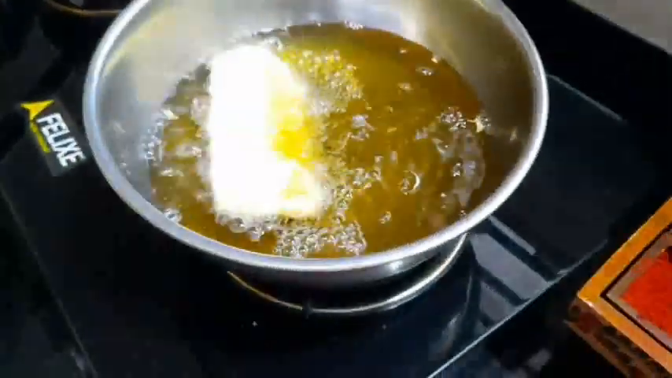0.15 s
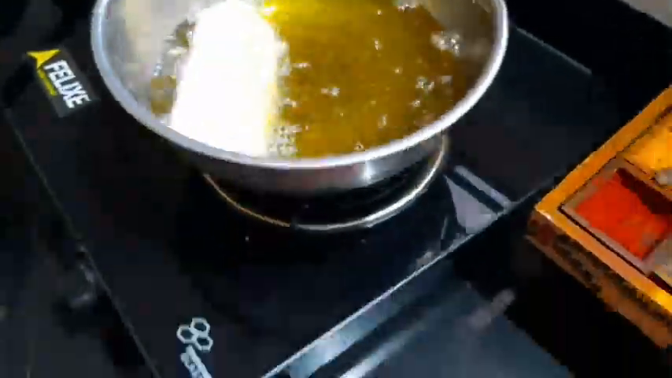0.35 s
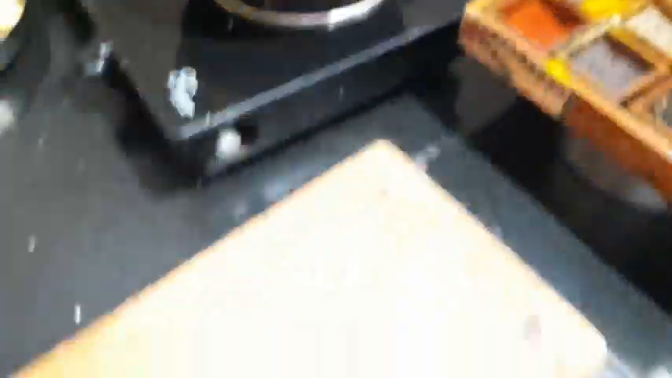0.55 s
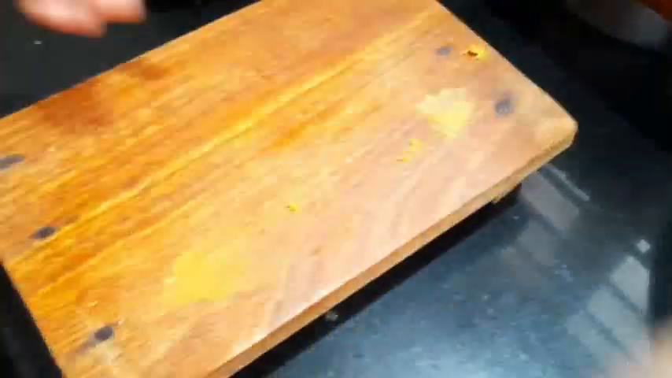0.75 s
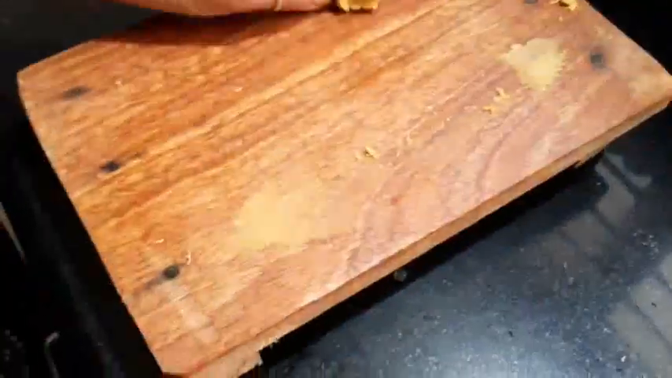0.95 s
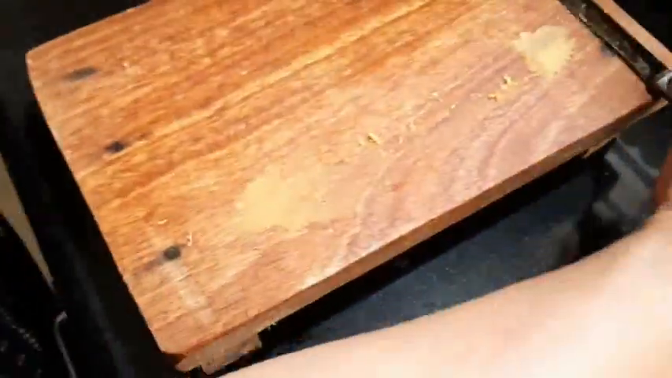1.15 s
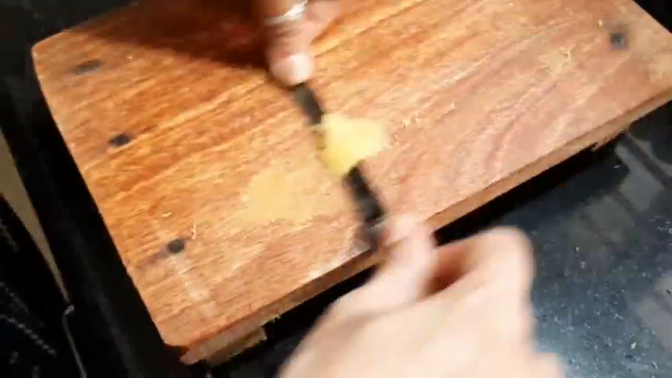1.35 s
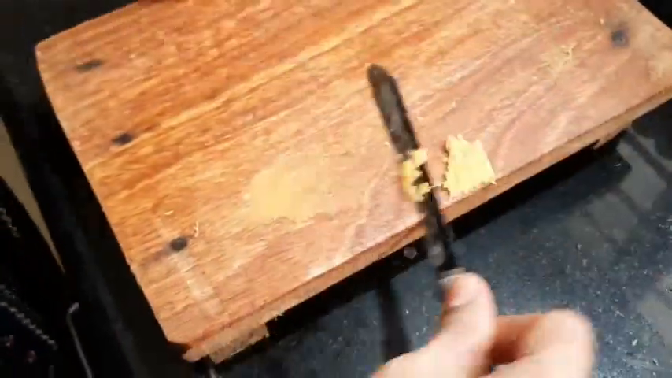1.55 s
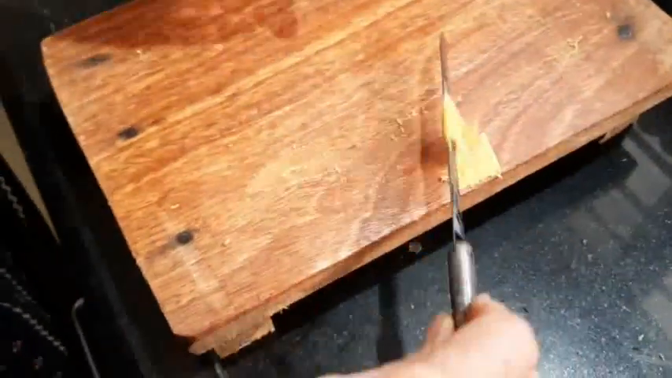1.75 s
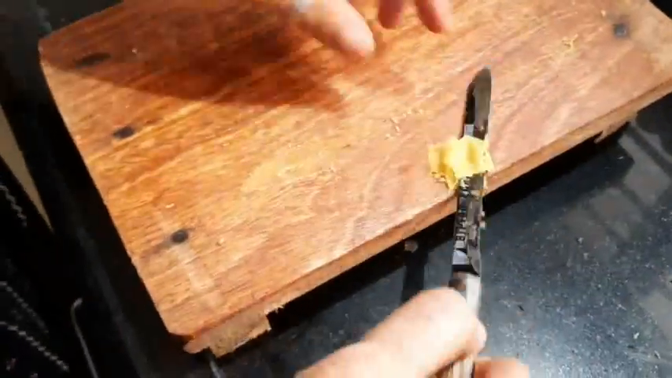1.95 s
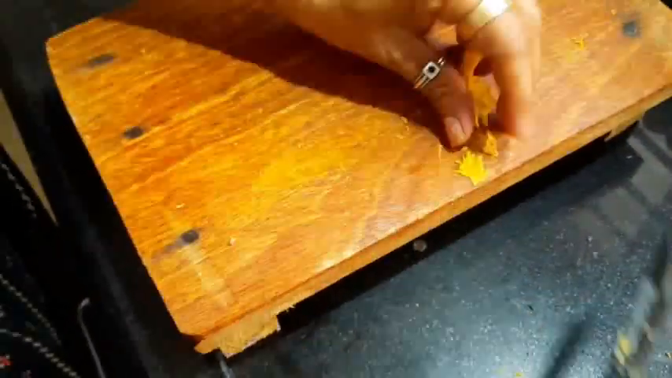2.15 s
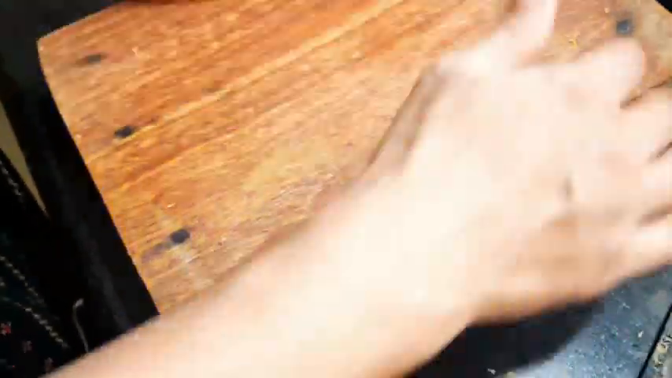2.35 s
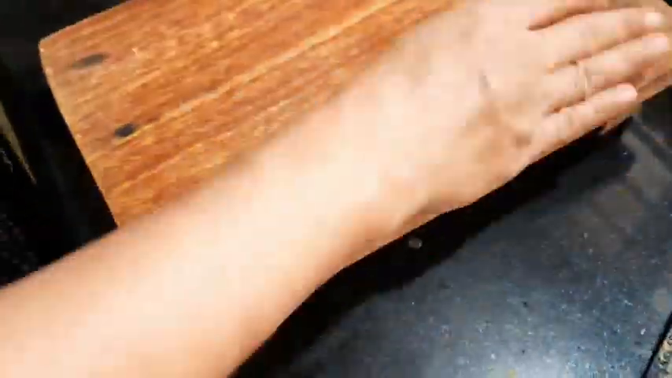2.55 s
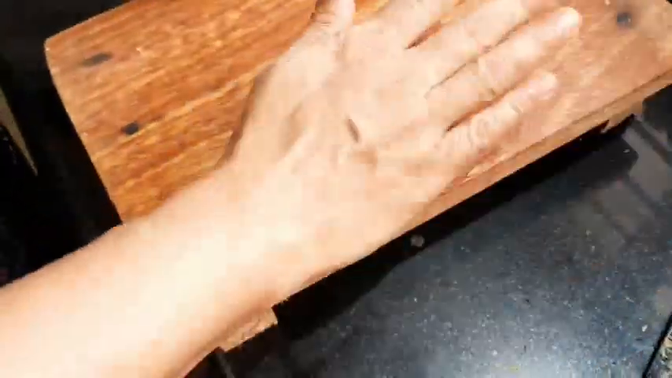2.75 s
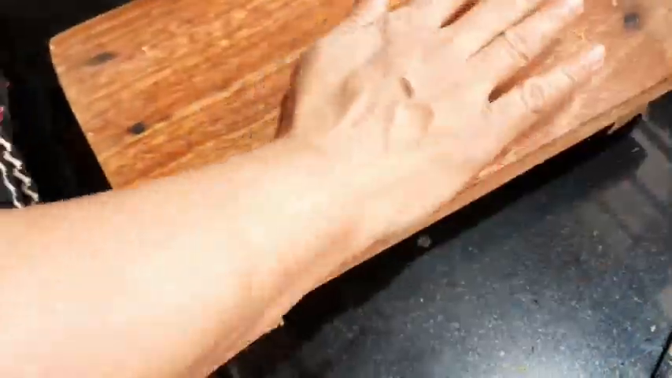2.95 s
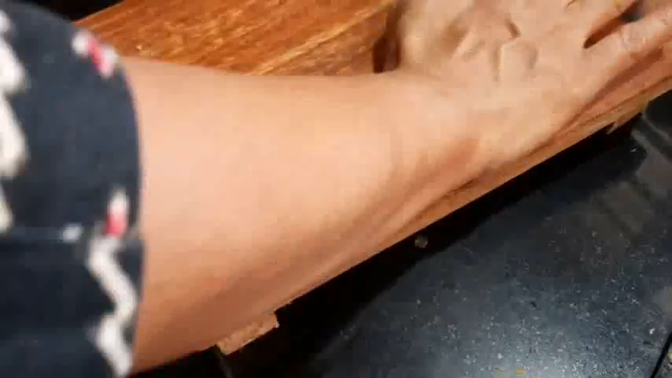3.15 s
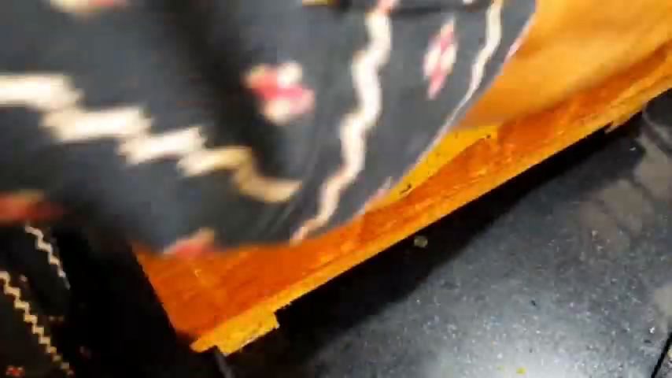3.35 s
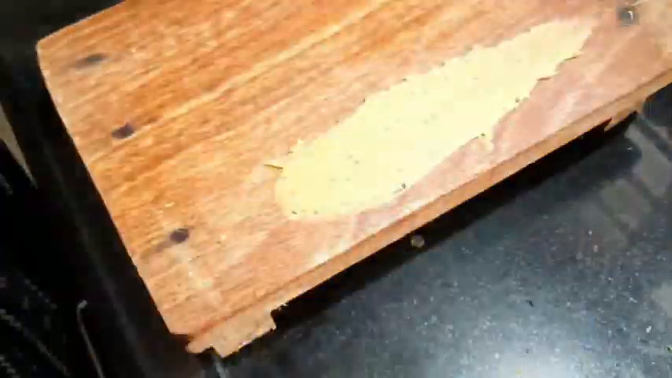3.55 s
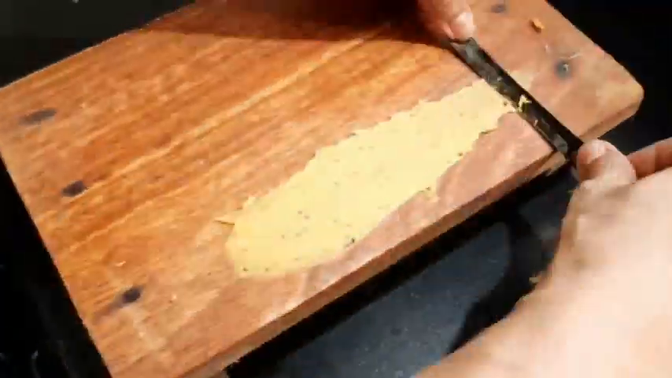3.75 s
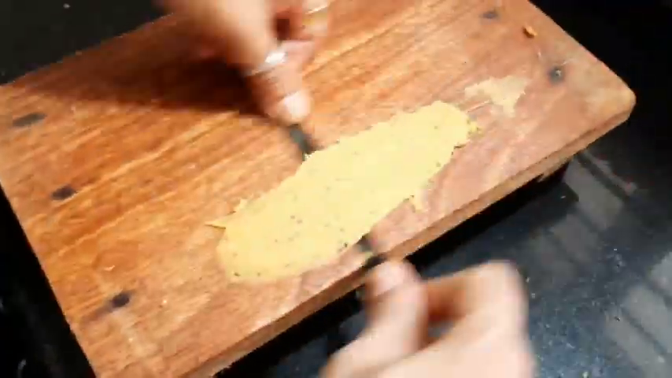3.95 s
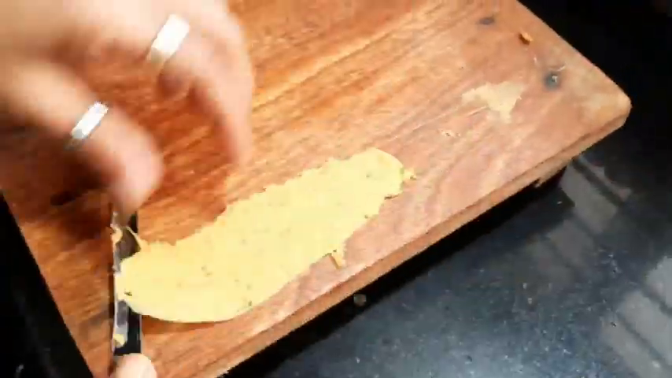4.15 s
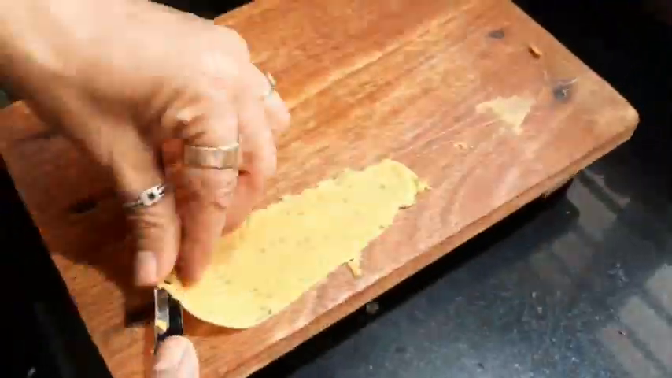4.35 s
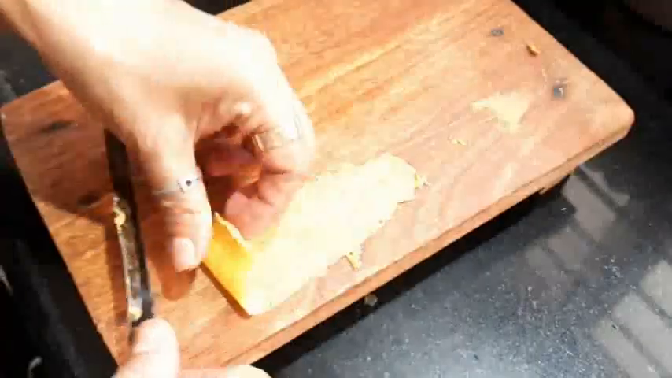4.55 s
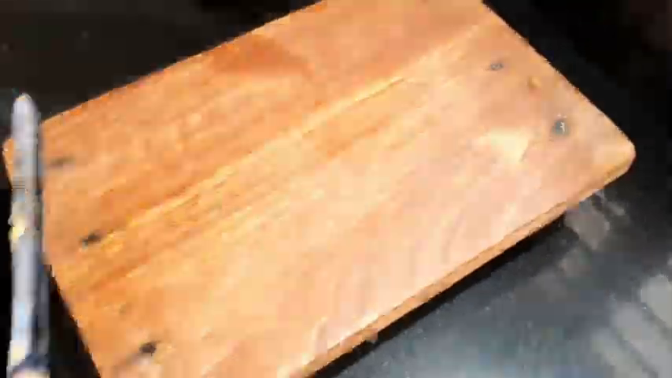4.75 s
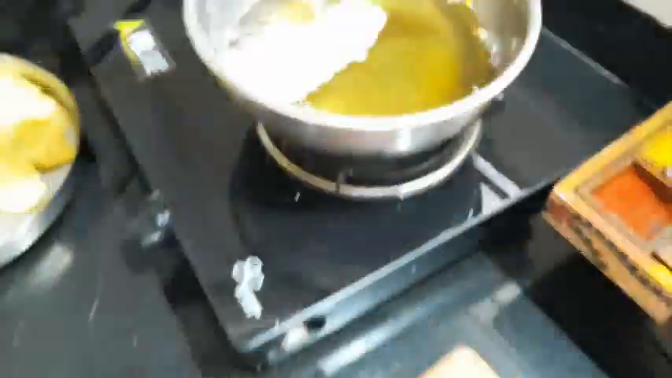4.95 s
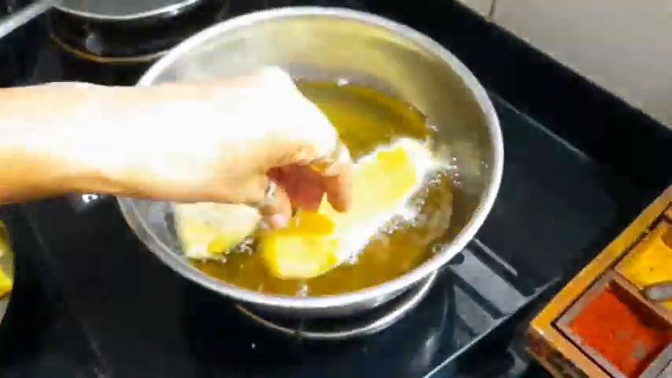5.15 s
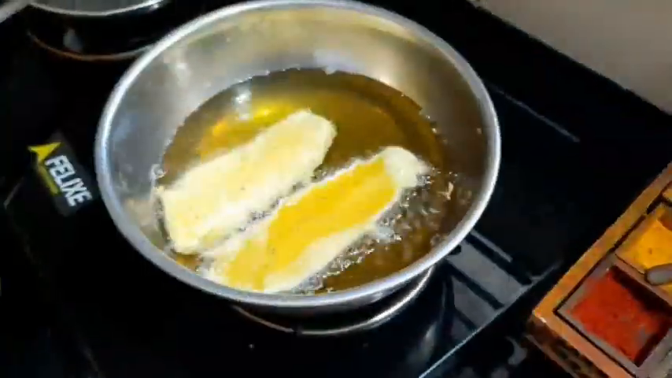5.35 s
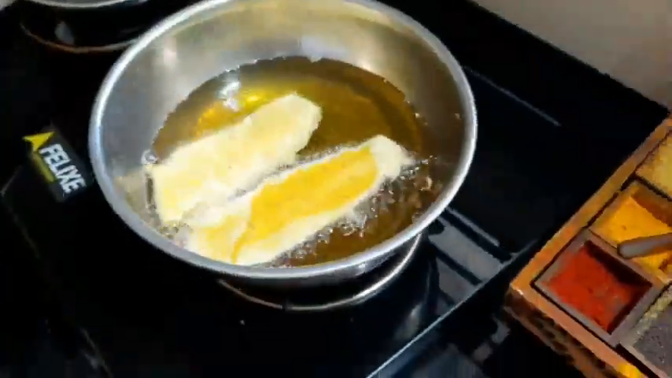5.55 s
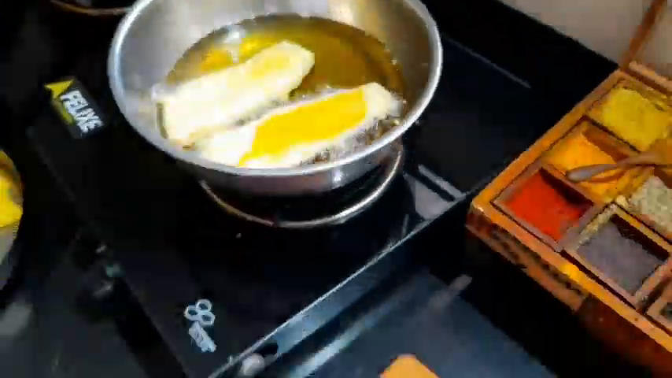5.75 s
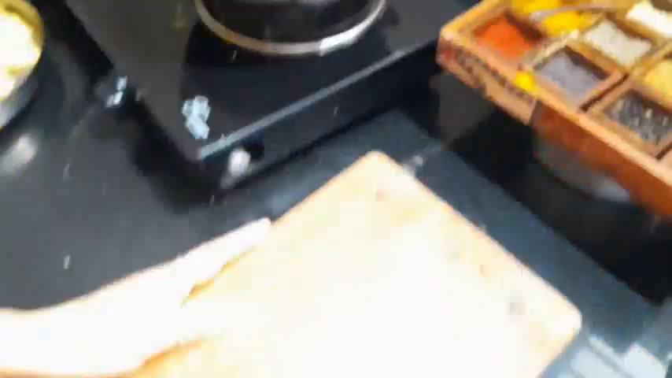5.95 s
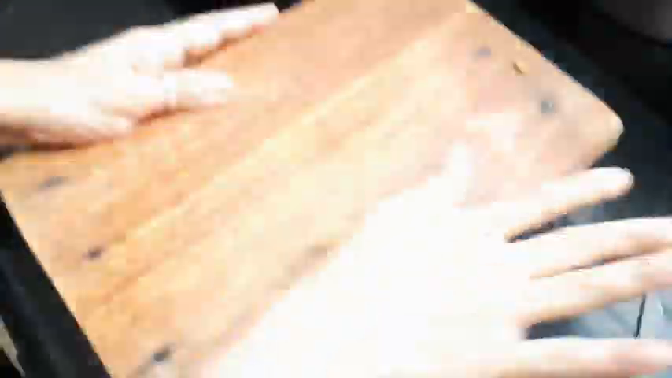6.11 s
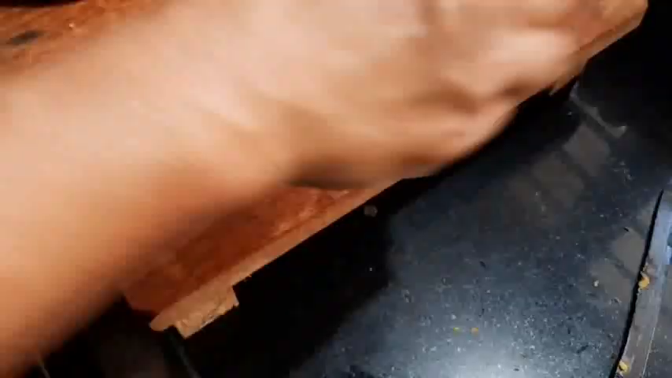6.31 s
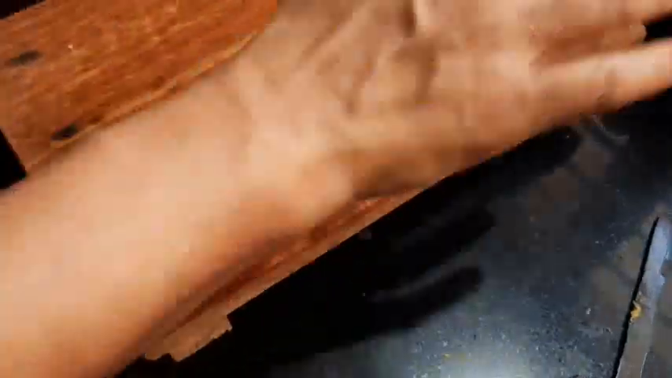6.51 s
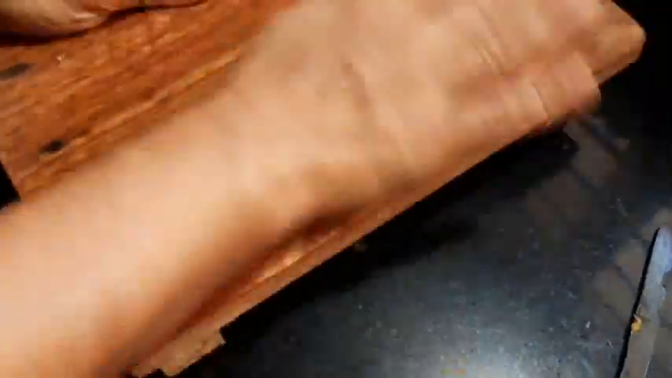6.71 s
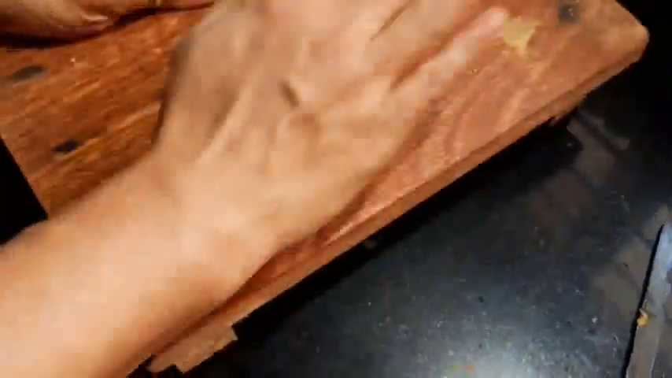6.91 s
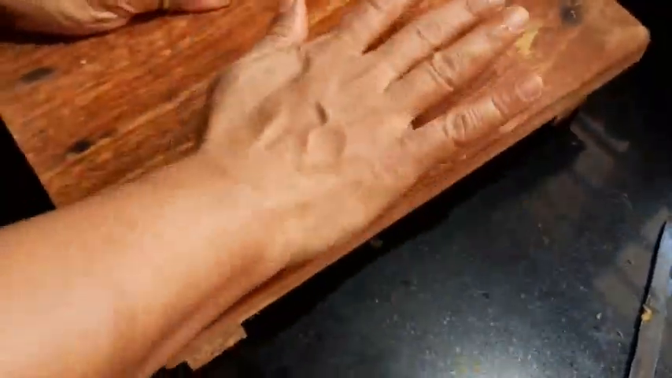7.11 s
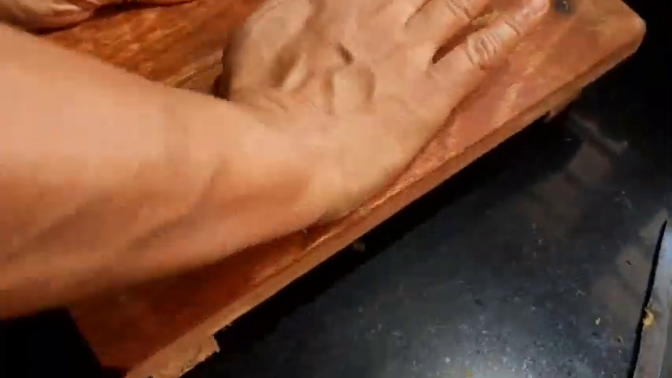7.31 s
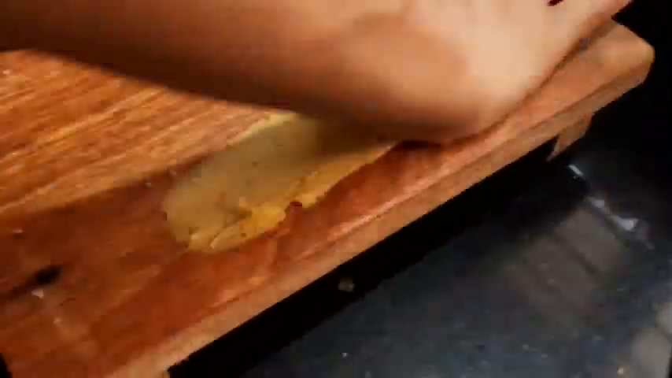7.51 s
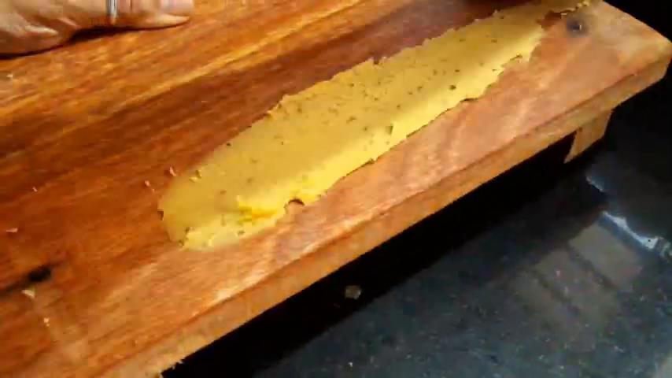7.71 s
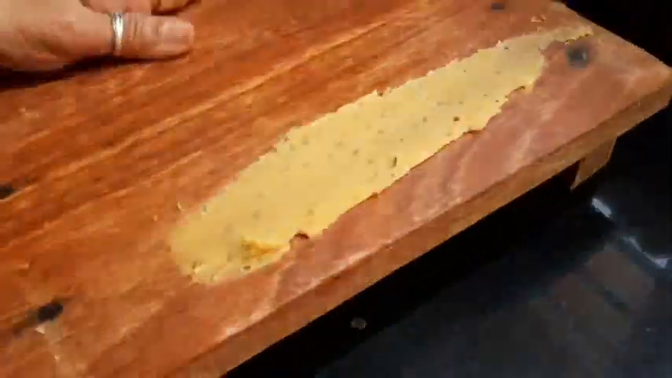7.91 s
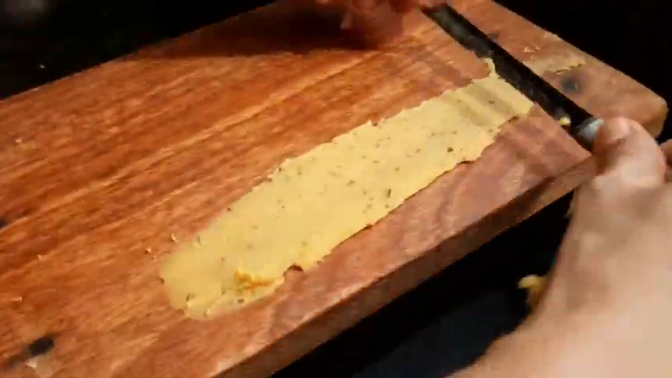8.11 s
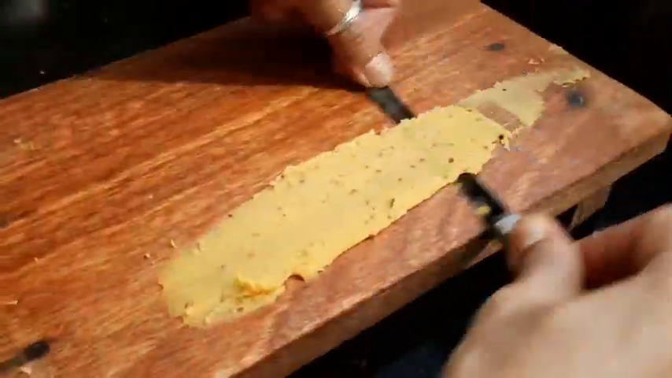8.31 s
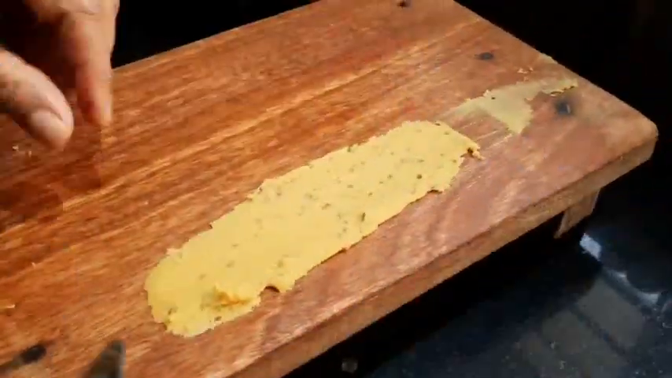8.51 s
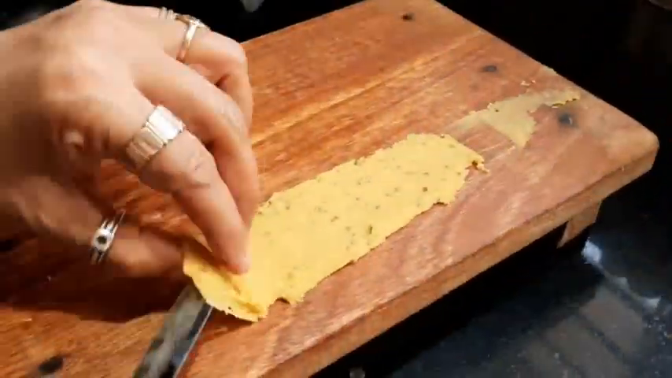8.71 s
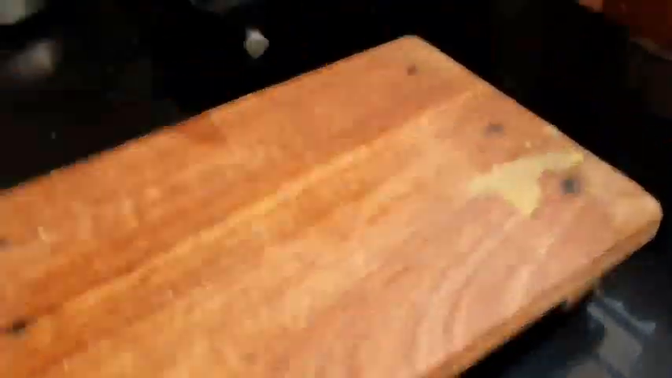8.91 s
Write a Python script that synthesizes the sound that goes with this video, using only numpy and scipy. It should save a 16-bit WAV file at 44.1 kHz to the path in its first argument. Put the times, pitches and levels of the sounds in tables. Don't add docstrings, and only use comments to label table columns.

```python
import sys
import numpy as np
from scipy import signal
from scipy.fft import rfft, irfft, next_fast_len
from scipy.io import wavfile

SR = 44100
rng = np.random.default_rng(int(sys.argv[2]) if len(sys.argv) > 2 else 0)


def dump(signal):
    limited = np.clip(np.atleast_2d(signal).T, -1, 1)
    pcm = np.round(limited * 32767).astype(np.int16)
    wavfile.write(sys.argv[1], SR, pcm)


def amplitude_ratio(level_db):
    exponent = np.asarray(level_db, float) / 20
    return 10 ** exponent


N = 399987

T = np.arange(round(.22 * SR)) / SR - .06
PORTS = np.array([[1], [-1]])

# frequency in Hz, level under the sum in dB.
SIDE_SHARE = [(60, -20), (110, -7.5), (200, -14), (380, -7.5), (700, -4), (1290, 0.5), (2380, -1),
              (4400, 1), (8120, -11.5), (15000, -11.5)]

# frequency in Hz, level in dB per Hz.
FRYING_COLOUR = [(1470, 1), (2500, -2), (3140, -6), (3290, -6), (4360, -4.5), (6430, -1.5), (10000, -4),
                 (12700, 0.5), (14500, -1), (15400, -2.5)]
KITCHEN_COLOUR = [(120, -65), (200, -1), (346, 4), (409, -5), (473, -6), (796, -8.5), (1260, -16),
                  (1760, -13), (2110, -17), (2600, -15.5), (3170, -18), (4500, -27.5), (5850, -38),
                  (9900, -120)]
RUMBLE_COLOUR = [(15, -63), (25, -23), (48, -16.5), (72, -10.5), (86, 0.5), (102, -6.5), (123, -6.5),
                 (190, -10), (250, -58), (420, -120)]
# time in seconds, frying level in dB.
PAN_NEARNESS = [(0, -49), (.12, -51), (.45, -55), (.7, -61), (1, -58.5), (2.3, -60), (2.7, -62),
                (4.05, -61), (4.2, -62), (4.77, -63), (5, -57), (5.38, -46.5), (5.71, -53.5), (6.2, -56.5),
                (6.9, -59.5), (8.15, -60), (8.36, -54.5), (8.52, -60.5)]
# time in seconds, level over rest in dB.
HAND_EFFORT = [(0, 4.5), (.5, 0.5), (1, 4), (1.3, 7), (1.6, 9), (1.8, 0), (2.2, 3.5), (2.32, 15.5),
               (2.5, 1.6), (3.95, 4.5), (4.2, -1), (5.2, 1.5), (6.2, 1.5), (6.55, 3.5), (6.9, -1.5),
               (8.03, 3), (8.2, 11), (8.7, 1)]
KITCHEN_DB, RUMBLE_DB, FAR_PAN_DB = -58, -58, -60.5
KITCHEN_FOLLOWS_EFFORT, KITCHEN_FOLLOWS_PAN = 0.58, 0.21

# peak in seconds, peak level in dB.
THUDS = [(1.455, -33), (1.529, -35), (1.679, -33.5), (1.78, -24), (2.008, -20), (2.24, -36), (2.336, -28),
         (2.421, -21.5), (2.636, -24), (3.428, -20), (3.593, -34), (4.023, -30), (5.125, -33.5),
         (5.998, -23.5), (6.059, -34), (6.157, -36), (6.263, -25), (6.384, -27.5), (6.443, -28.5),
         (6.586, -34), (6.663, -15.5), (6.835, -37), (7.723, -18.5), (8.175, -24), (8.401, -22),
         (8.483, -27)]
SLAB_HZ = 85.4
# peak in seconds, peak level in dB, pitch in Hz.
NUDGES = [(0.13, -37.5, 136), (1.138, -39, 170), (1.297, -34, 145), (1.501, -35.5, 129),
          (1.579, -31.5, 170), (2.211, -37, 126), (3.737, -24.5, 172)]
# peak in seconds, peak level in dB, pitch in Hz, left over right in dB.
PORT_BUMP = [
    (0.731, -36.5, 59, 21),
]

# bite in seconds, lead-in in seconds, drag in seconds, edge hiss in dB, wood tone in dB.
STROKES = [
    (1.28, 0.062, 0.11, -45, -41),
    (1.535, 0.041, 0.09, -49, -46),
    (3.92, 0.079, 0.17, -55.5, -51),
    (8.35, 0.071, 0.042, -49.5, -47),
    (8.45, 0.016, 0.043, -55, -53),
]
# resonance in Hz, width in Hz, level in dB.
SCRAPED_WOOD = [(620, 130, 4), (840, 125, 5.5), (1200, 270, -19), (1760, 150, -7), (2250, 140, -6),
                (3100, 230, -20)]
# frequency in Hz, level in dB per Hz.
EDGE_COLOUR = [(1180, -24), (2000, -21), (2270, -28), (3610, -20), (7280, -8.5), (7930, -14.5),
               (10500, -14.5), (12200, -10), (15400, -16)]
EDGE_LEAD_IN_DB, WOOD_LEAD_IN_DB = 29, 38
EDGE_SAG_DB_PER_S, WOOD_SAG_DB_PER_S = 42, 49
LIFT_DB_PER_S = 500

# peak in seconds, peak level in dB, centre in Hz, rise in ms, fall in ms.
RASPS = [(0.111, -49, 13160, 7.5, 35), (0.183, -45, 3500, 11, 5.5), (1.48, -49.5, 13000, 8.6, 12),
         (2.191, -32, 7140, 2, 14.5), (4.054, -25.5, 7400, 4.1, 10.3), (4.06, -25, 6450, 2.2, 5.4),
         (4.07, -46, 5500, 33, 13), (5.642, -41.5, 2880, 12, 15), (7.8, -50.5, 9000, 29, 13),
         (8.18, -48, 13100, 16, 20), (8.8745, -36, 9000, 1.5, 3.5), (8.883, -44, 7500, 3, 18)]
# peak in seconds, peak level in dB, centre in Hz, rise in ms, fall in ms.
TICKS = [(.474, -42.5, 4020, 8.5, 13), (0.651, -44.5, 3280, 13, 6.8), (0.729, -49.5, 1490, .53, 5.7),
         (1.859, -49, 2070, 4, 5.8), (2.399, -42.5, 2500, 9.9, 8.7), (7.702, -47, 4200, 1.5, 3),
         (2.268, -44.5, 1700, 10, 15), (2.193, -48, 2100, 4, 7.7), (5.173, -50, 7710, 7.2, 29),
         (5.589, -44, 3270, 26, 9.8), (6.145, -55.5, 3100, 3.3, 13)]
RASP_SLOPE_DB, TICK_SLOPE_DB = 1.06, 12
# peak in seconds, peak level in dB, pitch in Hz, half length in ms.
PING = [
    (7.1, -52, 2630, 20),
]
# peak in seconds, peak level in dB, centre of the rasp in Hz, rise in ms, fall in ms.
CLINKS = [
    [(0.013, -27.5, 4200, 25, 16)],
    [(5.403, -32.5, 4000, 8.7, 10.5)],
    [(0.94, -41, 3400, 5.6, 15)],
    [(2.267, -25.5, 4500, 10.7, 17)],
    [(7.916, -35, 8000, 13, 10)],
    [(1.056, -41.5, 3440, 7, 14)],
    [(3.537, -53, 8550, 5, 5.3), (5.338, -27.5, 5660, 3, 6.6), (5.351, -36, 6000, 4.7, 13)],
    [(5.56, -46, 8170, 14, 11)],
]
# frequency in Hz, width in Hz, level in dB.
STEEL_A = [(2010, 46, -2), (2610, 30, -2.5), (4230, 45, -4.5), (5050, 63, 1.5), (6180, 170, -4),
           (6940, 180, -10), (8100, 180, -16), (8900, 90, -10), (12100, 85, -3), (13600, 29, -16)]
STEEL_B = [(2640, 37, -0.5), (4200, 60, -2), (5080, 32, 0), (6870, 62, -12), (8000, 100, -15),
           (9470, 57, -6), (11400, 41, -16)]
STEEL_C = [(2320, 39, -2), (2630, 39, 5), (3990, 29, -4), (4400, 72, 1), (5420, 37, -7), (5910, 25, -17),
           (7170, 44, -3), (7990, 64, -14), (8900, 68, -8)]
STEEL_D = [(2630, 69, 0.5), (4470, 46, 0), (5020, 91, 2), (6040, 120, -1), (7180, 220, -2),
           (3620, 140, -14), (8100, 56, 2), (9300, 54, -1), (9800, 27, -13), (9940, 74, -3), (11200, 78, 3),
           (12260, 260, 2), (13400, 39, -6)]
STEEL_E = [(4560, 63, -4), (5030, 33, 0), (5940, 44, -10), (7260, 77, -15), (8600, 54, -8), (9000, 63, -3),
           (9350, 120, -7), (10550, 84, -10), (11970, 49, 1.5), (14000, 91, -7), (14400, 40, -3)]
STEEL_F = [(3610, 46, -2), (4160, 70, 3), (4980, 60, -5), (5500, 23, -10), (5940, 86, -1), (8700, 46, -9),
           (8750, 200, -8), (12130, 35, -4)]
STEEL_G = [(4290, 130, 6), (5030, 43, -0.5), (5900, 180, -11), (6900, 150, -5), (7970, 80, 4.5),
           (9050, 160, -1.5), (9800, 26, -9), (10300, 21, -23), (11900, 30, -18), (14000, 30, -22)]
STEEL_H = [(8260, 51, -3), (9400, 90, -12)]
STEELS = (STEEL_A, STEEL_B, STEEL_C, STEEL_D, STEEL_E, STEEL_F, STEEL_G, STEEL_H)
RING_DB = 3.5

# middle in seconds, peak level in dB, half length in ms.
SKIDS = [
    (8.8665, -20.5, 5),
]
# frequency in Hz, width in Hz, level in dB.
SKID_RINGS = [(1700, 280, -7.5), (2670, 670, -10), (5230, 1500, -2.5), (7970, 250, -7), (8800, 250, -6.5),
              (10000, 320, -7), (11400, 1100, -1), (13460, 600, -3)]

# peak in seconds, peak level in dB, pitch in Hz, half length in ms.
CATCHES = [(1.227, -50, 883, 5), (1.243, -40, 877, 4.8), (1.259, -36, 900, 7.1), (1.27, -32, 840, 5.5),
           (1.296, -39, 627, 8.9), (1.3, -38, 956, 7.4), (1.324, -45, 810, 11), (1.349, -44, 590, 8.8),
           (1.389, -50, 870, 6.5), (1.407, -52, 706, 3.5), (1.518, -43, 740, 2.5), (1.545, -49, 790, 5.7),
           (1.557, -47, 814, 4.1), (1.601, -48, 690, 5), (1.62, -48, 650, 5.4), (1.235, -51, 1790, 4),
           (1.248, -46, 1760, 5), (1.25, -52, 2250, 6.8), (1.27, -50, 2260, 7.7), (1.293, -40.5, 1750, 10),
           (1.315, -45, 1670, 8.2), (1.348, -50, 1790, 4.3), (1.385, -58, 1880, 4), (1.479, -51.5, 1740, 6),
           (1.532, -50, 800, 6), (1.572, -50, 830, 7), (1.555, -58, 2250, 6), (1.585, -52, 900, 5),
           (1.62, -54, 1700, 5.4), (3.93, -57, 1780, 11), (3.925, -52, 960, 8), (8.204, -49, 1480, 4),
           (8.286, -67, 1650, 4.6), (8.308, -53, 902, 4.5), (8.335, -55, 945, 5.5), (8.37, -52, 910, 8.9),
           (8.352, -46, 2250, 4.6), (8.411, -60, 1780, 4), (8.445, -50.5, 2540, 3.5),
           (8.456, -52, 900, 6.6), (8.455, -51, 3020, 6)]
# peak in seconds, peak level in dB, pitch in Hz, half length in ms.
SWELLS = [(.113, -36, 350, 4.7), (.185, -36.5, 785, 7.2), (.225, -50.5, 750, 23), (.3, -55, 805, 34),
          (0.329, -50, 336, 13), (.474, -26, 349, 11.4), (.48, -37, 830, 7), (0.502, -42, 400, 11),
          (.525, -52, 744, 15), (0.544, -47.5, 328, 9.2), (2.403, -20, 367, 5.5),
          (3.4065, -32.5, 5120, 0.77), (3.42, -55, 4500, 11), (3.4085, -22.5, 2250, 2.1),
          (4.061, -42.5, 400, 6.4), (2.411, -21, 900, 3.8), (7.706, -41, 560, 2.7), (8.869, -50, 1700, 3),
          (3.76, -42, 70.6, 16), (2.196, -41.5, 2120, 4.4), (3.39, -40.5, 350, 3.2),
          (8.215, -39.5, 193, 16), (2.0, -43, 300, 16), (3.4, -33, 700, 1), (3.429, -38.5, 327, 15),
          (3.724, -42, 557, 7.1), (3.787, -27.5, 354, 8), (3.79, -29, 920, 0.89), (3.79, -36.5, 1590, 1.4),
          (3.806, -46, 334, 3.5), (4.063, -40.5, 1906, 8.3), (5.66, -45, 300, 9.2), (5.705, -54, 368, 9.2),
          (5.869, -51, 326, 8.4), (5.972, -31.5, 350, 3.7), (5.995, -52, 980, 8.6), (6.02, -50, 626, 8.5),
          (6.663, -25, 620, 7.9), (1.06, -50, 1305, 6.7), (7.709, -29, 358, 10.4), (7.712, -46, 1160, 5),
          (8.151, -44, 710, 3.1), (8.174, -31, 620, 3.6), (8.214, -42.5, 300, 15)]

# peak in seconds, peak level in dB, loudest mode in Hz, rise in ms.
SLAMS = [
    (1.858, -47, 550, 4.9),
    (2.84, -40.5, 756, 8.3),
    (2.4098, -22, 635, 4.6),
    (3.4074, -11, 626, 2.2),
    (5.968, -47, 594, 3.6),
    (7.704, -15, 665, .84),
]
# peak in seconds, peak level in dB, loudest mode in Hz, rise in ms.
ROCKS = [(.112, -37, 765, 2.7), (0.179, -36, 328, 6.9), (.26, -51, 330, 2.4), (0.481, -33, 341, 11),
         (1.192, -36, 400, 4), (2.403, -27, 564, 5.6), (2.416, -23.5, 400, 7.6), (3.412, -25.5, 575, 1.8),
         (3.789, -32.5, 353, 5), (6.252, -43.5, 408, 1.2), (6.376, -46, 382, 3.2), (6.424, -48, 350, 9),
         (6.65, -27, 600, 5.5), (6.656, -20, 430, 1.8), (7.626, -27, 670, 1.3), (7.714, -28, 500, 1.6),
         (8.399, -43.5, 363, 6.4), (8.428, -44.5, 397, 3)]
# peak in seconds, peak level in dB, loudest mode in Hz, rise in ms.
PADDED = [
    (2.3172, -22.5, 617, 5.3),
    (3.73, -39, 594, 7.9),
    (4.012, -35.5, 361, 11),
    (5.979, -29, 610, 5.2),
    (8.161, -21, 630, 4.1),
]
# peak in seconds, peak level in dB, loudest mode in Hz, rise in ms.
LEANS = [(.3, -44.5, 307, 24), (0.644, -34, 300, 6.4), (1.766, -44, 290, 3.1), (1.983, -34.5, 626, 4),
         (5.41, -50, 884, 9.7), (5.479, -46.5, 343, 7.5), (5.639, -39, 370, 1.9), (6.67, -49, 593, 2.7),
         (8.072, -38.5, 300, 5.6), (8.19, -33, 400, 3.3)]
# fall in ms, hard part in dB, crack in dB.
CONTACT = [
    (1.83, -19, 0.5),
    (6.6, -21.5, -17),
    (5.1, -37, -40),
    (11.1, -22.5, -22),
]
# frequency in Hz, level in dB, 60 dB decay in seconds.
BOARD_LOW = [(204, -12.5, 0.043), (300, -11.5, 0.046), (400, -1, 0.017), (490, -15.5, 0.0076),
             (633, -15.5, 0.038), (756, -11.5, 0.039), (860, -23, 0.044), (1296, -27, 0.075)]
BOARD_HIGH = [(1275, 8, 0.037), (1416, 8, 0.066), (1786, 10, 0.045), (2320, -14, 0.074),
              (2620, -5.5, 0.037), (3100, -23, 0.017), (3500, -15, 0.03), (4050, -8, 0.046),
              (4500, -11, 0.11), (5270, -9, 0.04)]
CRACK_MS = 0.25

# middle in seconds, half length in ms, gain in dB.
DUCKS = [
    (2.182, 5.6, -40),
    (3.389, 3.2, -2),
    (4.04, 1, 1),
    (8.846, 4.5, -29),
]


def at_hz(points, hz):
    points_hz, points_db = np.transpose(points)
    return np.interp(np.log(hz), np.log(points_hz), points_db)


def in_time(rows):
    return np.interp(np.arange(N) / SR, *np.transpose(rows))


def drift(rate):
    r = np.exp(-80 * np.pi * rate / SR)
    slow = signal.lfilter([1], [1, -2 * r, r * r], rng.standard_normal(N // 40 + 2002))[2000:]
    return np.interp(np.arange(N) / 40, np.arange(len(slow)), slow / slow.std())


def grains(per_s, spread_db):
    sizes_db = spread_db * np.minimum(rng.exponential(1, (2, N)), 5)
    sizes = amplitude_ratio(sizes_db) * rng.standard_normal((2, N))
    return sizes * (rng.random(N) < per_s / SR)


def to_ports(mid, side, hz):
    return mid + amplitude_ratio(at_hz(SIDE_SHARE, hz)) * side * PORTS


def coloured(source, spectrum, patchy_db):
    size = next_fast_len(N)
    hz = np.maximum(np.arange(size // 2 + 1) * SR / size, 1)
    both = to_ports(*(rfft(source, size) * amplitude_ratio(at_hz(spectrum, hz))), hz)
    out, together = 0, drift(8.5)
    lowest, highest = np.log2(spectrum[0][0]), np.log2(spectrum[-1][0])
    for centre in np.arange(np.floor(lowest), highest + 1, .5):
        share = np.cos(np.pi / 2 * np.clip(2 * (np.log2(hz) - centre), -1, 1)) ** 2
        flicker_db = patchy_db * (0.52 * together + drift(22.0))
        out = out + amplitude_ratio(flicker_db) * irfft(both * share, size)[:, :N]
    return out / out.mean(0).std()


def add(out, s, sound):
    i = round((s - .06) * SR)
    part = sound[:, max(-i, 0):N - i]
    out[:, max(i, 0):max(i, 0) + part.shape[1]] += part


def shape(rise_ms, fall_ms, bend=0.83):
    ms = 1000 * T
    return np.exp(-np.maximum(-ms / max(rise_ms, .3), ms / max(fall_ms, .3)) ** bend)


def flutter(knots, depth):
    size = len(T)
    return 1 + depth * np.interp(np.arange(size), np.linspace(0, size, knots), rng.standard_normal(knots))


def rasp(swell, centre_hz, slope_db, wide_db=0.):
    hz = np.maximum(np.arange(len(swell) // 2 + 1) * SR / len(swell), 1)
    bumps_db = 4 * np.interp(hz, np.arange(60) * 400, rng.standard_normal(60))
    bumps_db -= 0.57 * np.maximum(hz / 1000 - 12.5, 0)
    colour_db = bumps_db - slope_db * np.log2(hz / centre_hz) ** 2
    mid, side = rfft(rng.standard_normal((2, len(swell)))) * amplitude_ratio(colour_db)
    out = swell * irfft(to_ports(mid, amplitude_ratio(wide_db * (hz > 6000)) * side, hz), len(swell))
    return out / np.abs(out.mean(0)).max()


def struck(swell, modes, scatter_db, wide):
    t = np.arange(len(swell))[:, None] / SR
    hz, db, t60 = np.transpose(modes)
    chance = rng.standard_normal((2, len(hz)))
    gap = wide * np.arctan(amplitude_ratio(at_hz(SIDE_SHARE, hz))) * np.sign(chance[1])
    soft_start = 1 - np.exp(-t * hz)
    decay = amplitude_ratio(db + scatter_db * chance[0] - 60 * t / t60) * soft_start
    rings = [(decay * np.sin(2 * np.pi * hz * t + side * gap)).sum(1) for side in (1, -1)]
    chatter = swell * rng.standard_normal(len(swell))
    out = signal.fftconvolve(rings, chatter[None])[:, :len(swell)]
    return out / np.abs(out.mean(0)).max()


def background():
    frying_db, effort_db = in_time(PAN_NEARNESS), in_time(HAND_EFFORT)
    kitchen_db = KITCHEN_DB + KITCHEN_FOLLOWS_EFFORT * effort_db
    kitchen_db = kitchen_db + KITCHEN_FOLLOWS_PAN * (frying_db - FAR_PAN_DB)
    frying = coloured(grains(per_s=15000, spread_db=0.0), FRYING_COLOUR, patchy_db=1.68)
    kitchen = coloured(rng.standard_normal((2, N)), KITCHEN_COLOUR, patchy_db=1.3)
    rumble = coloured(rng.standard_normal((2, N)), RUMBLE_COLOUR, patchy_db=1.5) * amplitude_ratio(-1.2 * PORTS)
    return amplitude_ratio(frying_db) * frying + amplitude_ratio(kitchen_db) * kitchen + amplitude_ratio(RUMBLE_DB + effort_db) * rumble


def counter():
    out = np.zeros((2, N))
    swell = np.exp(-(np.minimum(T, 0) / 0.0098) ** 2 - np.maximum(T, 0) / 0.014)
    pushes = [(*push, SLAB_HZ) for push in THUDS] + NUDGES
    for s, db, hz, pan_db in [(*push, -2.0) for push in pushes] + PORT_BUMP:
        swing = swell * np.sin(2 * np.pi * (hz * T + rng.random()))
        swing += amplitude_ratio(-10.0) * swell ** 2.1 * np.sin(2 * np.pi * ((hz + 95) * T + rng.random()))
        add(out, s, amplitude_ratio(db - 7.5) * swing * amplitude_ratio(pan_db / 2 * PORTS))
    return out


def steel_rasps():
    out = np.zeros((2, N))
    contacts = [(*row, RASP_SLOPE_DB) for row in RASPS] + [(*row, TICK_SLOPE_DB) for row in TICKS]
    for s, db, hz, rise_ms, fall_ms, slope_db in contacts:
        thin = signal.butter(2, hz / 18.0, "high", fs=SR, output="sos")
        chatter = rasp(shape(rise_ms, fall_ms), hz, slope_db, wide_db=5.0)
        add(out, s, amplitude_ratio(db + 4.0) * signal.sosfilt(thin, chatter))
    return out


def ping():
    out = np.zeros((2, N))
    for s, db, hz, half_ms in PING:
        add(out, s, amplitude_ratio(db) * shape(half_ms, half_ms) * np.sin(2 * np.pi * hz * (T + .06) + .7 * PORTS))
    return out


def partial(hz, width_hz, rise_ms, fall_ms):
    start, gap = rng.uniform(-np.pi, np.pi, 2)
    port_gap = 0.66 * np.sign(gap) * amplitude_ratio(at_hz(SIDE_SHARE, hz)) * PORTS
    fade = shape(1.36 * rise_ms, fall_ms * np.clip(70 / width_hz, .7, 1.3), bend=1.95)
    fade = fade * flutter(45 + round(hz / 150), .1 + width_hz / 110 + hz / 40000)
    fade = np.roll(fade, round(gap * rise_ms * SR / 7000))
    return fade * np.sin(2 * np.pi * hz * T + start + port_gap)


def clinks():
    out = np.zeros((2, N))
    for touches, partials in zip(CLINKS, STEELS):
        for s, db, hz, rise_ms, fall_ms in touches:
            ringing = sum(amplitude_ratio(level_db) * partial(f, width, rise_ms, fall_ms) for f, width, level_db in partials)
            chatter = rasp(shape(rise_ms, fall_ms, bend=1.0), hz, slope_db=0.5, wide_db=6.0)
            sound = chatter + amplitude_ratio(RING_DB) * ringing / np.abs(ringing).max()
            add(out, s, amplitude_ratio(db + 4.0) * sound / np.sqrt(1 + amplitude_ratio(2 * RING_DB)))
    return out


def steel():
    return (steel_rasps() + ping() + clinks()) * amplitude_ratio(-.8 * PORTS)


def skid():
    out = np.zeros((2, N))
    hz = np.maximum(np.arange(len(T) // 2 + 1) * SR / len(T), 1)
    for s, db, half_ms in SKIDS:
        sound = 0
        for f, width, level_db in SKID_RINGS:
            resonance = 1 / (1 + (2 * (hz - f) / width) ** 2) / np.sqrt(width)
            mid, side = rfft(rng.standard_normal((2, len(T)))) * resonance
            sound = sound + amplitude_ratio(level_db) * irfft(to_ports(mid, amplitude_ratio(0.5) * side, hz), len(T))
        sound = sound * np.exp(-(1000 * T / half_ms) ** 10)
        add(out, s, amplitude_ratio(db) * sound / np.abs(sound.mean(0)).max())
    return out


def stroke_db(lead_in_db, sag_db_per_s, levels_db):
    t, strokes_db = np.arange(N) / SR, []
    for (s, lead_s, drag_s, *_), db in zip(STROKES, levels_db):
        climb_db = lead_in_db * (np.maximum(s - t, 0) / lead_s) ** 2
        fade_db = sag_db_per_s * (t - s) + LIFT_DB_PER_S * np.maximum(t - s - drag_s, 0)
        strokes_db.append(db - np.maximum(climb_db, fade_db))
    return np.max(strokes_db, axis=0)


def blade():
    catches, wood = grains(per_s=5000, spread_db=3), 0
    for hz, width, db in SCRAPED_WOOD:
        r = np.exp(-np.pi * width / SR)
        poles = [1, -2 * r * np.cos(2 * np.pi * hz / SR), r * r]
        mid, side = signal.lfilter([1 - r * r, 0, r * r - 1], poles, catches)
        wood = wood + amplitude_ratio(db + 3.3 * drift(36)) * to_ports(mid, amplitude_ratio(0.5) * side, hz)
    *_, edge_peaks_db, wood_peaks_db = np.transpose(STROKES)
    edge_db = stroke_db(EDGE_LEAD_IN_DB, EDGE_SAG_DB_PER_S, edge_peaks_db)
    wood_db = stroke_db(WOOD_LEAD_IN_DB, WOOD_SAG_DB_PER_S, wood_peaks_db)
    hiss = coloured(catches, EDGE_COLOUR, patchy_db=0.0)
    return amplitude_ratio(edge_db) * hiss + amplitude_ratio(wood_db) * wood / wood.std()


def swells():
    out = np.zeros((2, N))
    for s, db, hz, half_ms in CATCHES + SWELLS:
        gap = np.arctan(amplitude_ratio(at_hz(SIDE_SHARE, hz) - 3.0))
        swell = np.exp(-(1000 * T / np.where(T < 0, half_ms, 1.2 * half_ms)) ** 2)
        swell = swell * flutter(90, min(hz / 3000, .9))
        add(out, s, amplitude_ratio(db) * swell * np.cos(2 * np.pi * hz * T + gap * PORTS) / np.cos(gap))
    return out * amplitude_ratio(1.2 * PORTS)


def knock(hz, rise_ms, fall_ms, hard_db, crack_db):
    low_band = signal.butter(2, [170, 1400], "band", fs=SR, output="sos")
    high_band = signal.butter(2, [1000, 6500], "band", fs=SR, output="sos")
    chatter = shape(.8 * rise_ms, .4 * fall_ms)
    before, after = shape(rise_ms, fall_ms, bend=1.7), shape(rise_ms, 1.03 * fall_ms, bend=1.53)
    spot = np.where(T < 0, before, after) * np.cos(2 * np.pi * hz * T + .35 * PORTS)
    held = np.clip(0.4 + fall_ms / 16, .4, 1.2)
    low = struck(chatter, np.multiply(BOARD_LOW, [1, 1, held]), scatter_db=1.0, wide=0.87)
    low = signal.sosfilt(low_band, low)
    high = signal.sosfilt(high_band, struck(chatter, BOARD_HIGH, scatter_db=0.0, wide=1.0))
    slap = rasp(shape(rise_ms, 1.87 * fall_ms), centre_hz=1250, slope_db=9.2)
    dull = rasp(shape(1.83 * rise_ms, 2.33 * fall_ms), centre_hz=550, slope_db=15.0)
    step = 1000 * T / CRACK_MS + .45 * PORTS
    crack = (1 - step ** 2) * np.exp(-step ** 2 / 2)
    body = amplitude_ratio(-2.0) * spot + amplitude_ratio(-5.5) * low + amplitude_ratio(-10.0) * dull
    return body + amplitude_ratio(hard_db) * (high + amplitude_ratio(7.5) * slap) + amplitude_ratio(crack_db) * crack


def board():
    out = np.zeros((2, N))
    for knocks, contact in zip((SLAMS, ROCKS, PADDED, LEANS), CONTACT):
        for s, db, hz, rise_ms in knocks:
            sound = knock(hz, max(rise_ms - 1.2, .8), *contact)
            add(out, s, amplitude_ratio(db + 5.5) * sound * amplitude_ratio(1.5 * PORTS))
    return out


def scene():
    return background() + counter() + steel() + skid() + blade() + swells() + board()


def roll_off(x):
    return signal.sosfilt(signal.butter(12, 16500, fs=SR, output="sos"), x)


def record(dry):
    treble = signal.sosfiltfilt(signal.butter(2, 1200, "high", fs=SR, output="sos"), dry)
    opened = 0
    for s, half_ms, db in DUCKS:
        ms = (np.arange(N) / SR - s) * 1000
        dry = dry - treble * (1 - amplitude_ratio(db)) * np.exp(-(ms / half_ms) ** 4)
        opened = opened + np.exp(-((ms - 20) / 16) ** 4)
    cut = signal.sosfiltfilt(signal.ellip(10, .3, 50, 15150, fs=SR, output="sos"), dry)
    wider = signal.sosfiltfilt(signal.ellip(10, .3, 50, 16400, fs=SR, output="sos"), dry)
    mix = cut + amplitude_ratio(-22) * opened * (wider - cut)
    return roll_off(mix)


dry = scene()
out = record(dry)
dump(out)
```